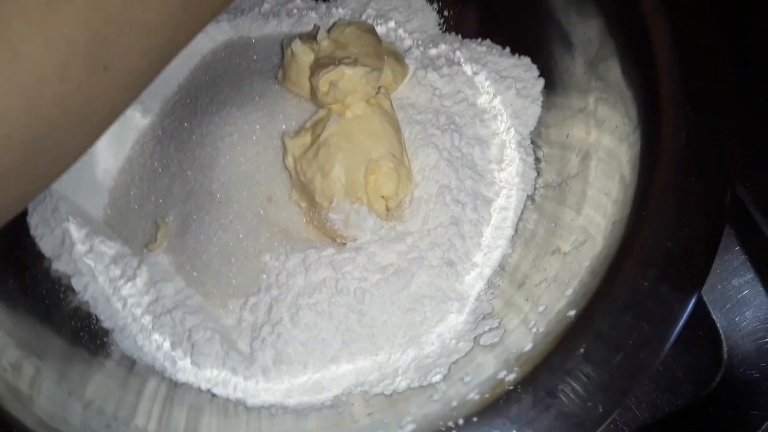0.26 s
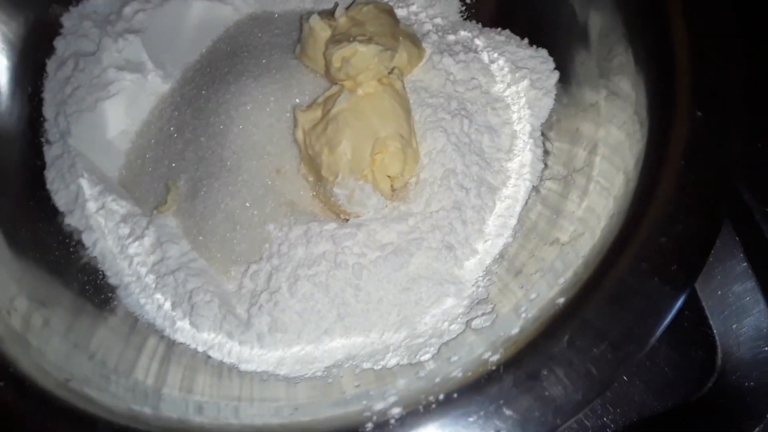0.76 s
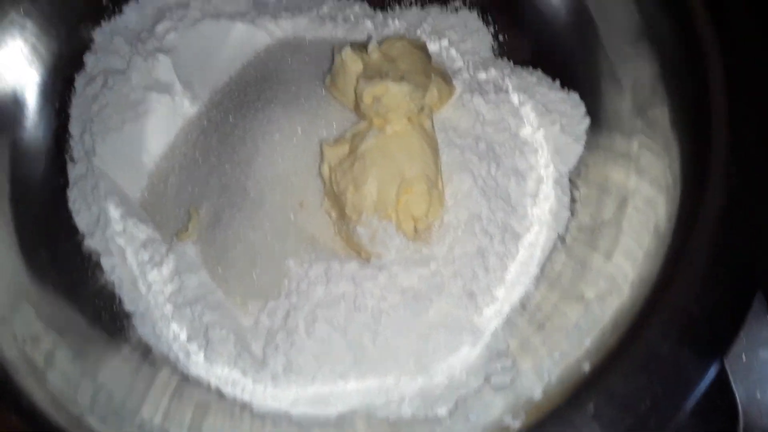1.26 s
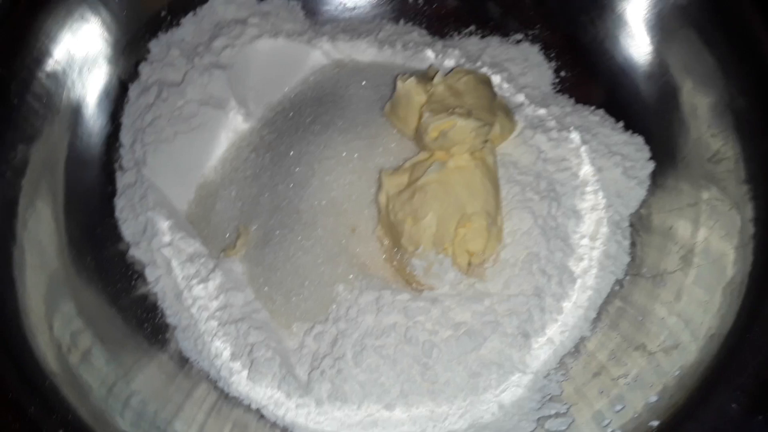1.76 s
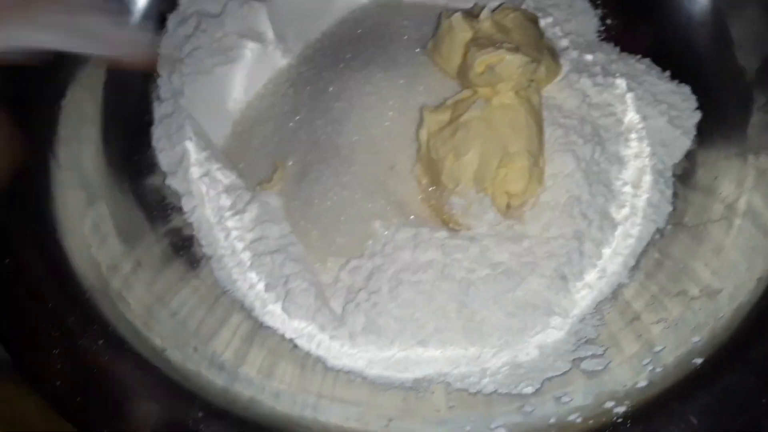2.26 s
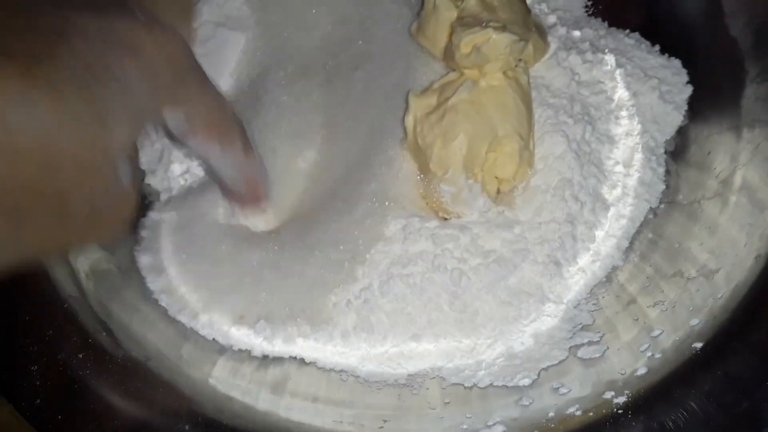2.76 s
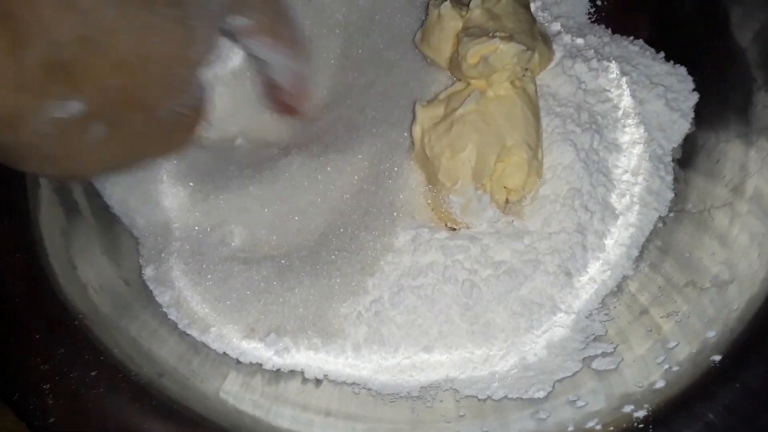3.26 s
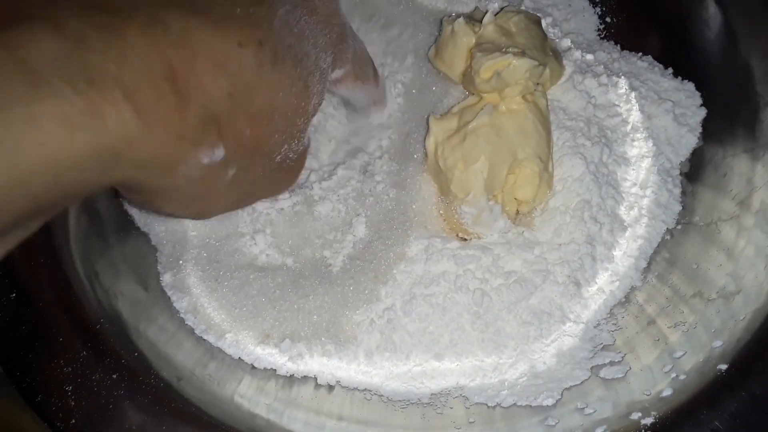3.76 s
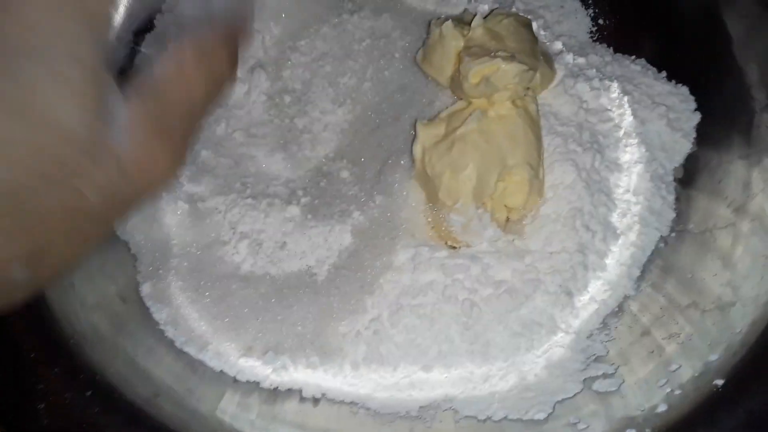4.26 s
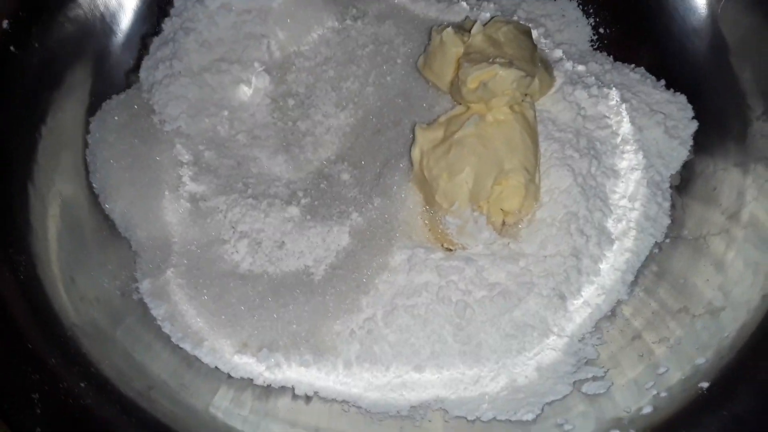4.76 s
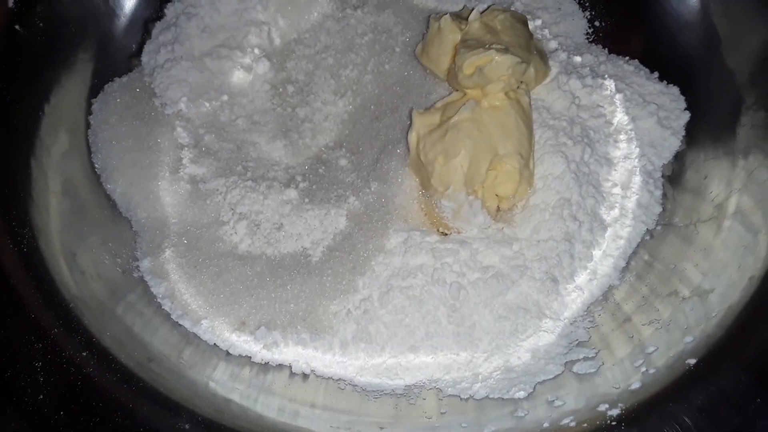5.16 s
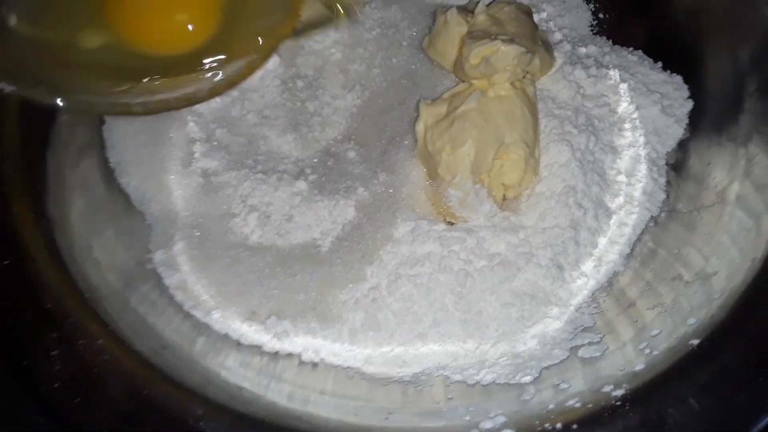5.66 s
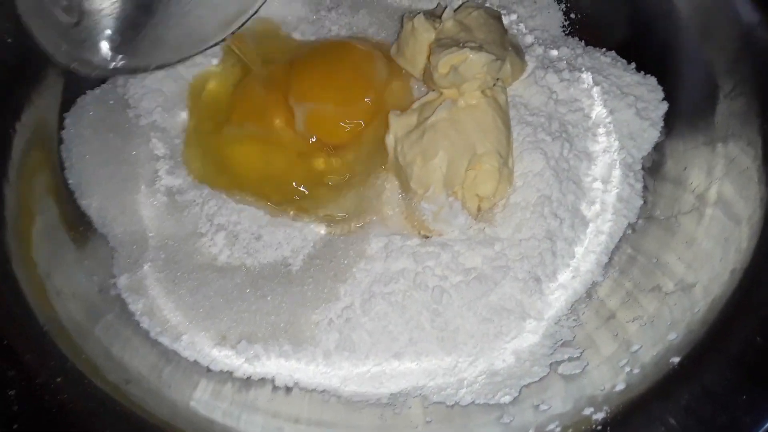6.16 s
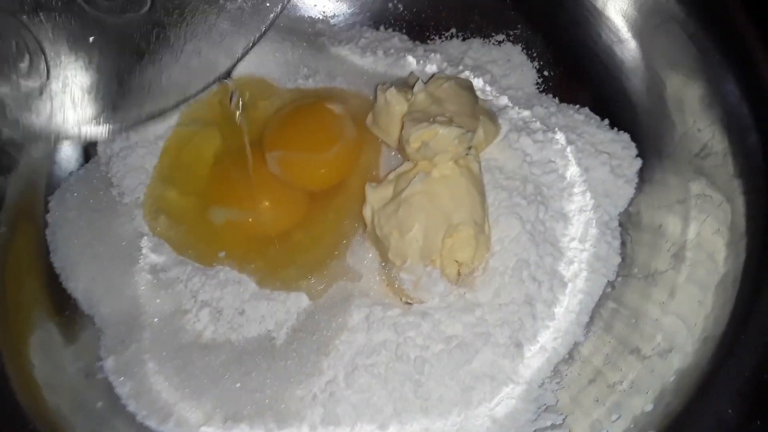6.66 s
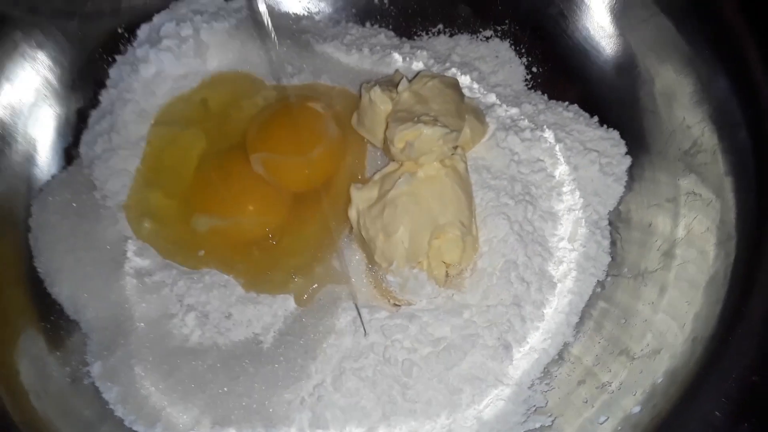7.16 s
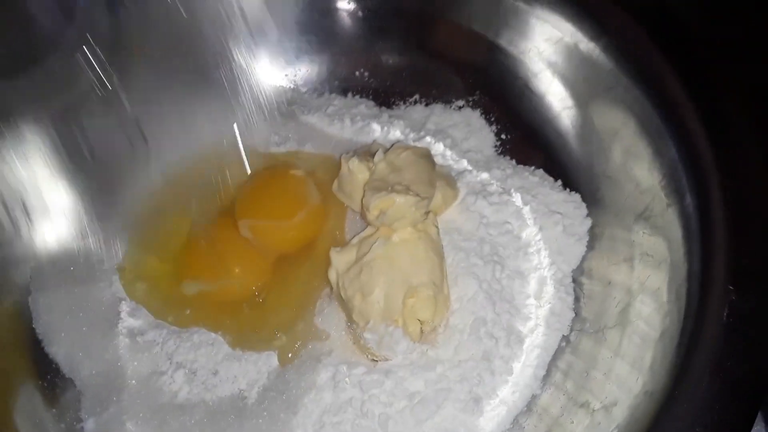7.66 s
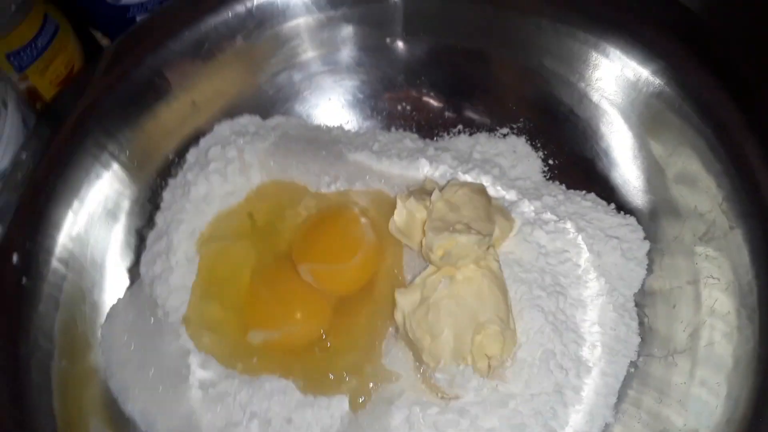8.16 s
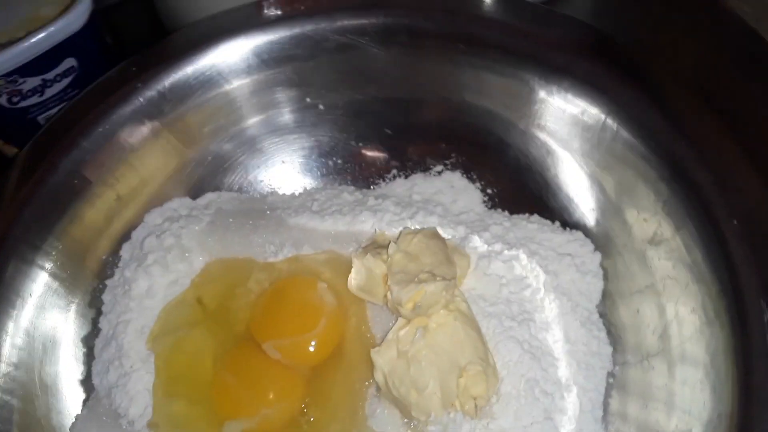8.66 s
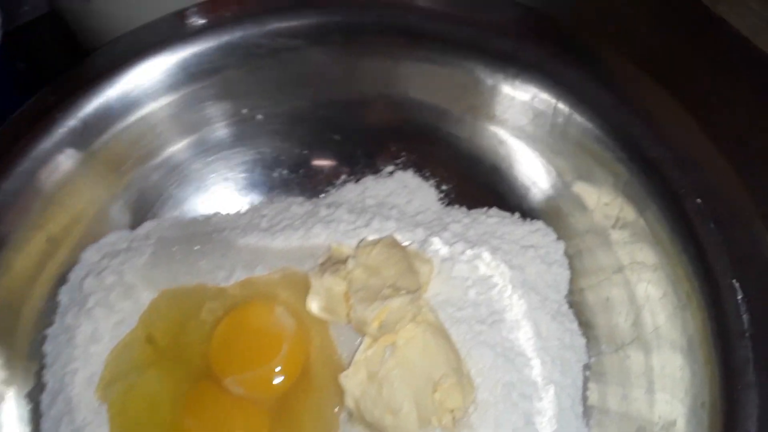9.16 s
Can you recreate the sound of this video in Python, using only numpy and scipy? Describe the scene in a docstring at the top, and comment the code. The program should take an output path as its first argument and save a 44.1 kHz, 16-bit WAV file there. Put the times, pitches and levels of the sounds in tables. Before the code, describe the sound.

In a small home kitchen with an open window, light taps and clinks come first, then a metal bowl lands hard and bounces on the worktop. Soft hollow rubbing strokes and hand rustle follow, with one loud tap midway and scattered clinks, before a final clatter of knocks. A small bird trills now and then, a cricket pulses faintly, and a low hum lies beneath. One close microphone, slightly thin in the bass.

```python
"""A home kitchen with the window open. Taps and clinks on the worktop and far whistles come first, then a bowl
lands and bounces; soft hollow rubbing strokes follow, and near the end the bowl lands again. Knocks ring
worktop modes and leave rattling noise. Throughout, hands rustle (banded noise), a sparrow-like bird trills
(fast falling sweeps), a cricket chirps (a pulsed narrow mode) and a low hum (resonant noise) lies under still air."""
import sys
import numpy as np
from scipy import signal
from scipy.io import wavfile

SR = 44100
rng = np.random.default_rng(int(sys.argv[2]) if len(sys.argv) > 2 else 0)


def log_audio(samples):
    """Write samples as a 16-bit WAV file to the path given in sys.argv[1]."""
    # one column per channel
    frames = np.atleast_2d(samples).T
    # limit to full scale, then quantise
    limited = np.clip(frames, -1, 1)
    pcm = np.round(limited * 32767).astype(np.int16)
    wavfile.write(sys.argv[1], SR, pcm)


N = 415272

KITCHEN_T60_S, KITCHEN_DB = 0.49, -19.5
YARD_T60_S = 0.25

# trilling bird: (time [s], relative level [dB], stretch in time [factor], pitch [factor])
BIRD_TRILLS = [(.478, -43, 0.9, 0.98), (1.686, -42, 0.8, 1.02), (3.471, -39, 0.89, 1.02),
               (4.643, -41.5, 0.84, 1.026), (5.612, -43, .95, 1), (7.143, -41, 0.95, 1.03),
               (8.329, -40, 0.97, 0.99)]


def amp(db):
    """Gain of a level in dB."""
    return 10 ** (np.asarray(db) / 20)


def rms_one(x):
    """Scaled to rms 1."""
    return x / np.sqrt(np.mean(x ** 2) + 1e-20)


def at_hz(points, hz):
    """A spectrum read on a log-frequency axis."""
    return np.interp(np.log(hz), np.log(np.array(points)[:, 0]), np.array(points)[:, 1])


def drift(rate_hz):
    """Slow chance of rms 1: noise through two equal poles at rate_hz, computed on every 40th sample."""
    r = np.exp(-2 * np.pi * rate_hz * 40 / SR)
    slow = signal.lfilter([1], [1, -2 * r, r * r], rng.standard_normal(N // 40 + 2002))[2000:]
    return np.interp(np.arange(N) / 40, np.arange(len(slow)), rms_one(slow))


def ring(clicks, hz, t60_s):
    """Two-pole resonator: a unit click sets off a dying sine of initial height 1."""
    r = 1000 ** (-1 / (t60_s * SR))
    w = 2 * np.pi * hz / SR
    return signal.lfilter([0, np.sin(w)], [1, -2 * r * np.cos(w), r * r], clicks + 1e-18)


def between(columns_db, hz):
    """Level at hz, on the line through two neighbouring bands of the four."""
    # bass, middle, treble, air: (centre [Hz])
    band_centres_hz = [250, 1050, 3000, 13000]
    place = np.interp(np.log(hz), np.log(band_centres_hz), np.arange(4))
    low = min(int(place), 2)
    return columns_db[low] + (place - low) * (columns_db[low + 1] - columns_db[low])


def echoes(x, t60_s, wet_db):
    """Direct sound plus a dense noise tail of reflections, decaying exponentially."""
    t = np.arange(int(.5 * SR)) / SR
    tail = rng.standard_normal(len(t)) * 1000 ** (-t / t60_s) * (t > .004)
    tail /= np.sqrt(np.sum(tail ** 2))
    return x + amp(wet_db) * signal.fftconvolve(x, tail)[:N]


def knocks():
    """Every knock strikes the worktop's modes, most of all those near its two pitches, and adds a short clink."""
    # worktop modes: (frequency [Hz], relative level [dB], t60 [s])
    worktop = [(144, -3, 0.095), (191.7, -3, 0.033), (275.4, -5.5, 0.078), (406.3, -6.5, 0.14),
               (559, -8, 0.08), (689, -11.5, 0.09), (922, -5, 0.045), (1034, -8.5, 0.037),
               (1211, -7.5, 0.035), (1296, -8.5, 0.038), (1530, 0, 0.013), (1823, -12, 0.098),
               (2185, -13, 0.1), (2780, -20, 0.013), (3320, -15, .03)]
    rows = contacts()
    time_s, clink_db, clink_hz = rows[:, 0], rows[:, 1], rows[:, 6]
    bands_db, pitches_hz = rows[:, 2:6].T, rows[:, [7, 9]]
    at = np.round(time_s * SR).astype(int)
    scatter_db = rng.normal(0, 0.23, (len(rows), len(worktop)))
    out = np.zeros(N)
    for k, (hz, level_db, t60_s) in enumerate(worktop):
        octaves_off = np.log2(hz / pitches_hz)
        favoured_db = 8 * np.exp(-(octaves_off / 0.11) ** 2).max(axis=1)
        clicks = np.zeros(N)
        clicks[at] = amp(between(bands_db, hz) + level_db + favoured_db + scatter_db[:, k])
        out += ring(clicks, hz, t60_s) * (-1) ** k
    out = echoes(out, 0.14, -5.5)
    t = np.arange(SR // 5) / SR
    clink_decay = 1000 ** (-t / 0.03)   # t60 0.03 s
    for i, level_db, hz in zip(at, clink_db, clink_hz):
        out[i:i + len(t)] += amp(level_db - 3) * np.sin(2 * np.pi * hz * t) * clink_decay
    return signal.sosfilt(signal.butter(4, [110, 5500], "band", fs=SR, output="sos"), out)


def contacts():
    """All contacts as rows that set how hard and how bright each one strikes and how noisy it is."""
    # the bowl lands and bounces on the worktop: (time [s], relative bass level [dB], treble over bass [dB],
    # bass pitch [Hz], middle pitch [Hz], clink [Hz], rattle t60 [s])
    thuds = [(0.644, -43, -7, 420, 700, 3280, .19), (1.038, -44, -3.5, 220, 860, 2130, 0.19),
             (1.6625, -3.5, -10.5, 381, 977, 3880, 0.07), (1.7566, -19.5, -12, 407, 877, 4090, 0.12),
             (1.843, -10.5, -16.5, 386, 690, 3045, .063), (1.9246, -21, -14.5, 268, 706, 3220, 0.1),
             (2.477, -42, 0.5, 424, 1310, 1920, .29), (8.934, -10, -5, 145, 1290, 3150, .088),
             (8.983, -18.5, -11.5, 150, 1250, 3060, .12), (9.0612, -7.5, -5, 278, 1200, 2540, .16),
             (9.111, -11.5, -8.5, 272, 1030, 1800, 0.19), (9.164, -26.5, -9.5, 396, 1030, 2620, 0.2)]
    # hollow taps: (time [s], relative middle level [dB], bass over middle [dB], treble over middle [dB],
    # middle pitch [Hz], clink [Hz], rattle t60 [s])
    taps = [(0.129, -34.5, -3, -17, 960, 1790, 0.057), (0.238, -39.5, -10.5, 1, 910, 2120, 0.16),
            (1.061, -40, 1, -2, 1310, 2410, .16), (1.858, -16.5, -6.5, -15, 760, 1800, 0.1),
            (3.188, -28.5, -3, -11, 1020, 1970, .065), (3.256, -30.5, -2, -3, 1010, 3040, 0.16),
            (3.3301, -28.5, -1, -11, 1030, 3750, 0.022), (3.458, -36, -1, -11, 1020, 1810, 0.069),
            (3.588, -27, -4.5, -6, 1030, 1810, 0.038), (4.9251, -31, -4, -8, 1250, 2240, 0.24),
            (5.115, -6.5, -7, -10, 1504, 3230, 0.059)]
    # small hard clinks: (time [s], relative treble level [dB], air over treble [dB], pitch [Hz], rattle t60 [s])
    clinks = [(0.1008, -27, -30, 2120, .033), (0.323, -48, -24, 4200, .08), (0.335, -47, -34, 2260, .1),
              (2.322, -48, -27, 2990, .16), (2.8829, -20.5, -22.5, 4520, 0.16),
              (4.2118, -43.5, -26, 2500, 0.052), (5.0857, -28, -21, 4170, 0.17),
              (6.101, -36, -29, 2270, .025), (6.206, -42, -26, 4160, 0.033), (6.224, -49, -12, 5460, 0.06),
              (7.039, -29, -27.5, 4290, 0.16), (7.8302, -31, -45, 3170, 0.079),
              (8.1363, -34, -26, 2060, 0.14)]
    # short scrapes: (time [s], relative treble level [dB], air over treble [dB], middle over treble [dB],
    # rattle t60 [s])
    scrapes = [(0.853, -42, -50, -5, 0.071), (0.861, -32, -41, -3.5, 0.47), (0.894, -32, -31, -1, 0.12),
               (2.664, -48.5, -17, -15, .25), (2.7, -47, -10, -5, 0.59), (2.915, -34, -21.5, -3.5, 0.11),
               (3.1991, -24, -14, -17.5, 0.21), (3.222, -31.5, -0.5, -9, .077),
               (3.285, -35.5, -24, -5.5, 0.06), (5.104, -28, -40, -3, 0.086),
               (6.769, -47.5, -22, -12, 0.37), (6.901, -36.5, -18, -10, 0.19),
               (7.822, -35.5, -31, -5, 0.19), (8.089, -39, -18.5, -7, 0.12), (8.181, -37, -48, -4, 0.15),
               (8.967, -26, -17, 6, 0.12)]
    # row: time s, clink dB, bass dB, middle dB, treble dB, air dB,
    #      clink Hz, middle Hz, rattle t60 s, bass Hz, noisiness dB
    rows = [(s, db + up + 5.5, db, db - 7, db + up, db + up - 28,
             clink_hz, middle_hz, t60_s, bass_hz, -1)
            for s, db, up, bass_hz, middle_hz, clink_hz, t60_s in thuds]
    rows += [(s, db + up + 6.5, db + low, db, db + up, db + up - 41.5,
              clink_hz, middle_hz, t60_s, 186, -3)
             for s, db, low, up, middle_hz, clink_hz, t60_s in taps]
    rows += [(s, db + 7.5, db - 22.5, db - 16.5, db, db + air,
              hz, 1220, t60_s, 430, -1)
             for s, db, air, hz, t60_s in clinks]
    rows += [(s, db - 3, db + body - 7, db + body, db, db + air,
              3710, 1320, t60_s, 420, 0)
             for s, db, air, body, t60_s in scrapes]
    return np.array(rows)


def rattle_db():
    """Level of dying contact noise in four bands; short ones crack, long ones (scrapes) start softly."""
    # noise against its contact in bass, middle, treble, air: (relative level [dB])
    rattle_share_db = [-6.5, -9, -11.5, 1]
    power, t = np.full((4, N), 1e-14), np.arange(SR // 2) / SR
    room = amp(KITCHEN_DB) ** 2 * (1 - np.exp(-t / 0.008)) * 10 ** (-6 * t / KITCHEN_T60_S)
    for s, _, *band_db, _, _, t60_s, _, noisy_db in contacts():
        at, t60_s = round(s * SR), np.clip(t60_s, .015, .3)
        crack = max(1 - t60_s / .2, 0) * np.exp(-t / 0.0027)
        rattle = (1 - np.exp(-t / (0.073 * t60_s ** 2))) * 10 ** (-6 * t / t60_s)
        shape = crack + rattle + room
        band_power = amp(np.add(band_db, rattle_share_db) + noisy_db)[:, None] ** 2
        power[:, at:at + len(t)] += (band_power * shape)[:, :N - at]
    return 10 * np.log10(power)


def rustle_db():
    """Level of rustle and brushes in the four bands; brightness tilts them about the treble."""
    # rustling and shuffling: (time [s], relative level [dB], brightness [dB per band step])
    rustle = [(0.0, -54, -2.5), (0.34, -59.5, 4), (0.73, -59.5, -1.5), (1.83, -58.5, 1.5), (1.99, -62.5, 2),
              (3.15, -68.5, -1), (3.33, -58, 0), (3.8, -52.5, -0.5), (4.46, -59.5, -3.5), (5.11, -57.5, -3),
              (5.43, -65.5, -5), (6.71, -64.5, -1.5), (6.92, -63.5, -3), (7.66, -63.5, -0.5),
              (7.92, -61, -4), (8.76, -57.5, 1.5), (8.99, -57, -6), (9.1, -62, -11), (9.26, -58, -6),
              (9.42, -62.5, 1)]
    # bass, middle, treble, air at brightness 0: (relative level [dB])
    rustle_bands_db = [-2.5, -4, -2.5, -18.5]
    # brief brushes of the hand: (time [s], length [s], relative peak [dB], brightness [dB per band step])
    brushes = [(0.1, 0.26, -50, 7), (1.543, 0.14, -54, -4.5), (2.642, 0.2, -52, 0), (3.066, 0.19, -48, 0.5),
               (3.398, 0.18, -48, 4), (3.78, 0.16, -59, 10), (6.744, 0.28, -54.5, 0.5),
               (7.8, 0.15, -58, -4.5)]
    steps = np.arange(-2, 2)[:, None]
    s, level_db, bright_db = np.transpose(rustle)
    t = np.arange(N) / SR
    power = amp(np.interp(t, s, level_db) + steps * np.interp(t, s, bright_db)) ** 2
    for s, length_s, peak_db, bright_db in brushes:
        swell = np.hanning(round(length_s * SR))
        brush = amp(peak_db + steps * bright_db) * swell
        part = power[:, round(s * SR):][:, :len(swell)]
        part += brush[:, :part.shape[1]] ** 2
    return 10 * np.log10(power) + np.array(rustle_bands_db)[:, None]


def noises():
    """Still air, rustle and rattle share one bank of third-octave noise bands; the last two are grainy."""
    # how moving noise reaches the microphone: (frequency [Hz], gain [dB per third octave])
    colour = [(40, -44), (80, -24.5), (130, -8.5), (300, -6), (1000, -6.5), (2200, 1), (4200, 6.5),
              (5500, 1), (7000, -12.5), (9000, -29.5), (11000, -14.5), (15000, -2.5)]
    # still air: (frequency [Hz], relative density [dB per Hz])
    air_spectrum = [(24, -48), (40, -4), (163, 2.5), (312, -20.5), (529, 2.5), (585, -8.5), (1070, -18.5),
                    (2150, -9), (4340, -11), (5870, -27), (7000, -37), (7930, -35.5), (16000, -30)]
    rustle, rattle = rustle_db(), rattle_db()
    edges_hz = 40 * 2 ** (np.arange(27) / 3)
    white = rng.standard_normal((2, N))   # neighbouring bands draw on different noise
    grain, crunch = drift(40), drift(140)
    air_total = sum(amp(at_hz(air_spectrum, hz)) ** 2 * hz for hz in edges_hz)
    out = 0
    for k, (low, high) in enumerate(zip(edges_hz, edges_hz[1:])):
        hz = np.sqrt(low * high)
        air = amp(-60 + at_hz(air_spectrum, hz)) ** 2 * hz / air_total
        hands = amp(between(rustle, hz) - 6.5 + 1.97 * grain + 0.92 * drift(20)) ** 2
        rattling = amp(between(rattle, hz) + 1.5 * drift(30) + 1.4 * crunch) ** 2
        band_power = air + (hands + rattling) * amp(at_hz(colour, hz)) ** 2
        gain = np.sqrt(band_power * SR / 2 / (high - low))   # power to white-noise density
        band = signal.butter(3, [low, high], "band", fs=SR, output="sos")
        out = out + signal.sosfilt(band, gain * white[k % 2])
    return out


def strokes():
    """Rubbing noise in hollow resonances; each swells and fades with its own moment of peak in the stroke."""
    # soft rubbing strokes: (time [s], relative level [dB], length [s])
    rubs = [(4.004, -50.5, 0.21), (4.385, -50, 0.24), (4.765, -50.5, 0.23), (5.586, -52, 0.31),
            (6.03, -51.5, 0.26), (7.679, -53.5, 0.17), (7.998, -54, 0.2), (8.328, -49.5, 0.22),
            (8.721, -48.5, 0.23)]
    # resonances of the hollow thing: (frequency [Hz], nominal width [Hz], relative level [dB], peak moment [0-1])
    hollow = [(178.4, 21, -5, 0.34), (378, 20, -2, 0.26), (577, 33, -7, 0.1), (916, 39, -0.5, 0.11),
              (714, 250, -1, 0.26), (2600, 930, 3.5, 0.24), (3650, 1000, -4, 0.3)]
    white, out = rng.standard_normal(N), 0
    for hz, width_hz, level_db, moment in hollow:
        swell = np.zeros(N)
        for s, stroke_db, length_s in rubs:
            part = np.linspace(1e-3, 1, round(length_s * SR))
            rise = part / max(moment, .03)
            swell[round(s * SR):][:len(part)] += amp(stroke_db) * rise * np.exp(1 - rise) * (1 - part ** 4)
        t60_s = 1.78 / width_hz
        tone = rms_one(ring(ring(white, hz, t60_s), hz, t60_s))
        out = out + amp(level_db - 2.5) * swell * tone
    return echoes(out, 0.12, -12.5)


def trills():
    """A trill starts as a thin note and opens into uneven falling sweeps, about 105 a second."""
    # shape of a trill: (time after start [s], relative level [dB], centre [Hz], sweep to either side [Hz])
    trill_shape = [(0, -16, 4696, 124), (.012, -8, 4650, 143), (.028, -5, 4217, 560), (.05, 1.5, 3848, 894),
                   (.09, -0.5, 3685, 940), (.125, -0.5, 3450, 850), (.155, -10, 3285, 722),
                   (.18, -19, 3190, 600)]
    out = np.zeros(N)
    beat = np.cumsum(105 * (1 + 0.076 * drift(30))) / SR % 1
    after_s, shape_db, centre_hz, sweep_hz = np.transpose(trill_shape)
    ragged = 1 + 0.25 * drift(40)   # no two sweeps reach equally far
    for s, level_db, stretch, pitch in BIRD_TRILLS:
        t = np.arange(round(after_s[-1] * stretch * SR)) / SR / stretch
        at = round(s * SR) + np.arange(len(t))
        sweep = np.interp(t, after_s, sweep_hz) * ragged[at] * (1 - 2 * beat[at])
        hz = pitch * np.interp(t, after_s, centre_hz) + sweep
        pulse = np.sin(np.pi * beat[at]) ** 0.39
        level = amp(level_db + np.interp(t, after_s, shape_db))
        out[at] += pulse * level * np.sin(2 * np.pi * np.cumsum(hz) / SR)
    return out


def through_window(x):
    """The way in through the window favours a few strands: resonant peaks added one after another."""
    # favoured strands: (frequency [Hz], width [Hz], relative level [dB])
    window = [(2700, 50, -0.5), (3480, 100, -2), (3870, 65, -2.5), (4710, 610, -4)]
    for hz, width_hz, level_db in window:
        x = x + amp(level_db + 4.5) * signal.lfilter(*signal.iirpeak(hz, hz / width_hz, fs=SR), x)
    return x


def whistles():
    """Wavering sine glides: far whistles, thin rings and a rising lead-in ahead of each trill."""
    # far whistles and thin rings: (time [s], length [s], start [Hz], end [Hz], relative level [dB])
    far_whistles = [(0.13, 0.1, 3840, 3730, -46), (0.132, 0.16, 4560, 4300, -52.5),
                    (0.14, 0.14, 3520, 3504, -49), (0.16, 0.073, 2150, 2140, -51),
                    (0.354, .12, 2080, 2740, -51), (0.573, 0.12, 2295, 1873, -54),
                    (0.932, 0.15, 2784, 2800, -53.5), (1.074, 0.079, 2280, 2278, -50),
                    (1.22, 0.088, 2790, 2720, -51.5), (1.231, 0.16, 2110, 2050, -52),
                    (1.299, .14, 2720, 2710, -57), (1.436, 0.1, 2300, 2330, -51),
                    (6.76, 0.078, 2070, 2156, -50.5), (6.75, 0.065, 4620, 4730, -55),
                    (6.8, 0.057, 2670, 2660, -53.5), (6.79, 0.11, 3760, 3706, -53),
                    (6.844, 0.054, 4950, 4900, -57), (6.897, 0.11, 3950, 3950, -47),
                    (6.916, 0.092, 7020, 7070, -64)]
    lead_ins = [(s - .04, .09, 5140, 6600, db - 18.5) for s, db, *_ in BIRD_TRILLS]
    out, waver_hz = np.zeros(N), 60 * drift(82)
    for s, length_s, start_hz, end_hz, level_db in far_whistles + lead_ins:
        at = round(s * SR) + np.arange(round(length_s * SR))
        waver_share = 0.39 + 20 * abs(end_hz / start_hz - 1)   # glides waver most
        hz = np.linspace(start_hz, end_hz, len(at)) + waver_hz[at] * waver_share
        out[at] += amp(level_db - 0.5) * np.hanning(len(at)) * np.sin(2 * np.pi * np.cumsum(hz) / SR)
    return out


def birds():
    """Trills and whistles with a flickering level and the yard's echoes."""
    song = through_window(trills()) + whistles()
    return echoes(song * amp(3.4 * drift(55)), YARD_T60_S, 0.55)


def cricket():
    """Wing strokes, 104 a second in chirps of 0.59 of a period, ring one narrow mode."""
    # (time [s], lag of the chirps [s])
    cricket_lag = [(.7, .055), (2.7, .048), (3.7, .063), (4.7, .073), (5.7, .068), (6.7, .06), (7.7, .066),
                   (8.7, .071)]
    period_s, mode_hz, level_db = .1139, 6887, -76
    t = np.arange(N) / SR
    phase = (t - np.interp(t, *np.transpose(cricket_lag))) / period_s % 1
    chirp = np.sin(np.pi * np.clip(phase / 0.59, 0, 1)) ** 0.52
    wing = (1 + np.sin(2 * np.pi * 104 * t)) ** 1.2
    song = ring(chirp * wing * rng.standard_normal(N), mode_hz, .012)
    song = echoes(ring(song, mode_hz, 0.0046), YARD_T60_S, 0.5)
    return amp(level_db + 2.3 * drift(2.3)) * rms_one(song)


def hum():
    """Noise in narrow resonances that wax and wane."""
    # resonances of the hum: (frequency [Hz], nominal width [Hz], relative level [dB])
    hum_modes = [(176.3, 20, 5), (386, 37, -2.5), (527.3, 31, 2), (948, 13, -13), (1390, 70, -7),
                 (2087, 200, 2), (2306, 20, 0.5), (2610, 130, -23), (3460, 42, -10.5), (4355, 260, 0)]
    white, out = rng.standard_normal(N), 0
    for hz, width_hz, level_db in hum_modes:
        t60_s = 3.7 / width_hz
        tone = rms_one(ring(ring(white, hz, t60_s), hz, t60_s))
        out = out + amp(level_db + 4.1 * drift(3.7)) * tone
    return amp(-59) * rms_one(out)


def scene():
    """All sources at one microphone."""
    return (knocks() + noises() + strokes() + birds() + cricket() + hum())[None]


def record(dry):
    """The bass rolls off below 80 Hz, peaks are rounded, the top is cut at 16050 Hz."""
    thin = signal.sosfilt(signal.butter(1, 80, "high", fs=SR, output="sos"), dry)
    rounded = 1.364 * np.tanh(thin / 1.666)
    return signal.sosfilt(signal.cheby2(18, 70, 16050, fs=SR, output="sos"), rounded)


dry = scene()
out = record(dry)
log_audio(out)
```